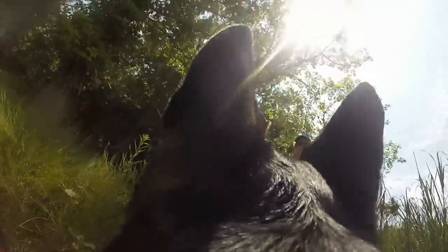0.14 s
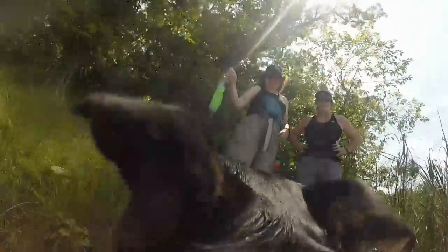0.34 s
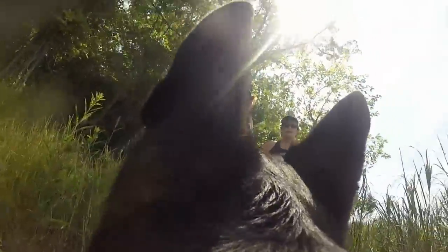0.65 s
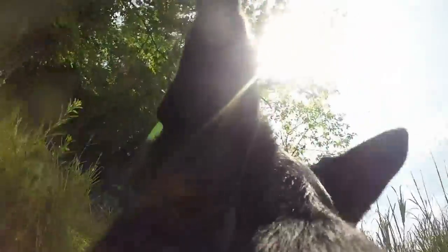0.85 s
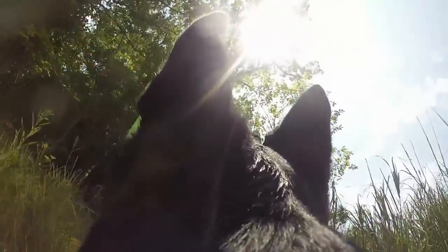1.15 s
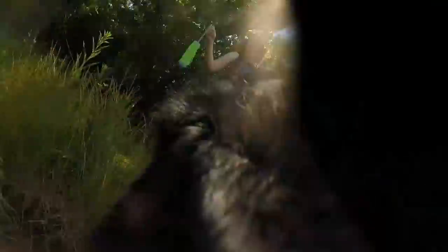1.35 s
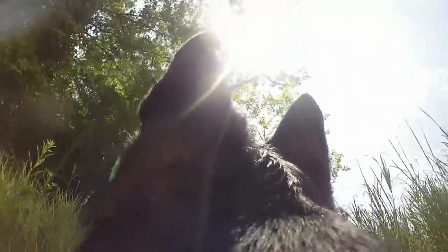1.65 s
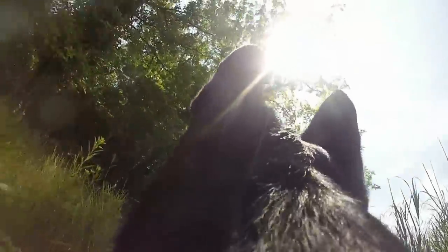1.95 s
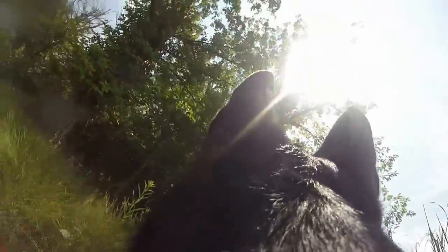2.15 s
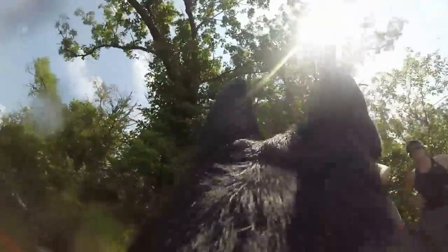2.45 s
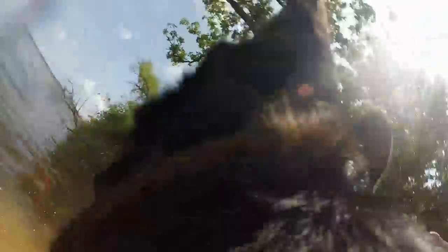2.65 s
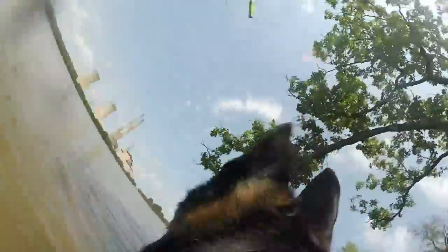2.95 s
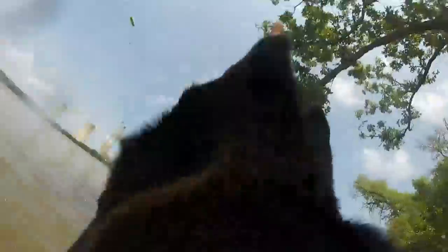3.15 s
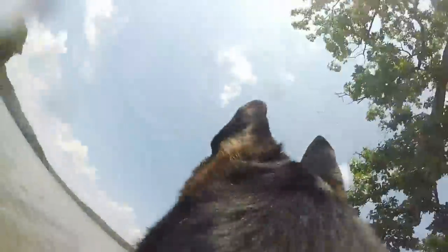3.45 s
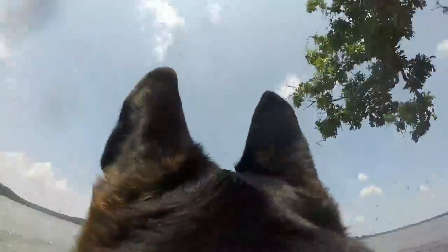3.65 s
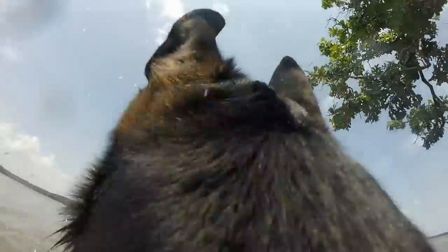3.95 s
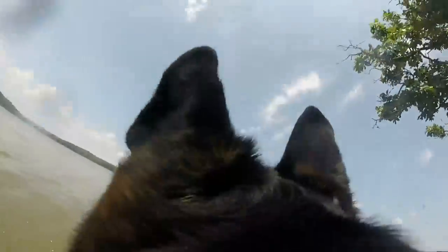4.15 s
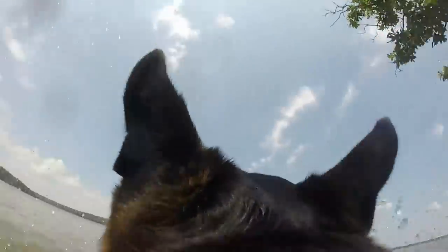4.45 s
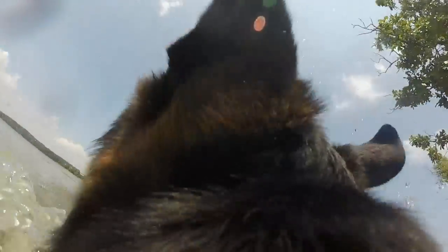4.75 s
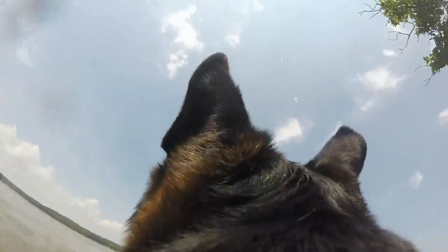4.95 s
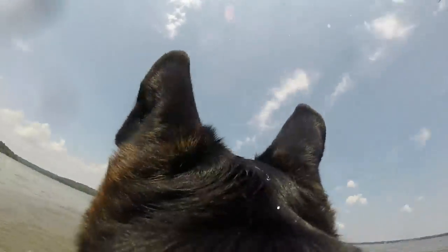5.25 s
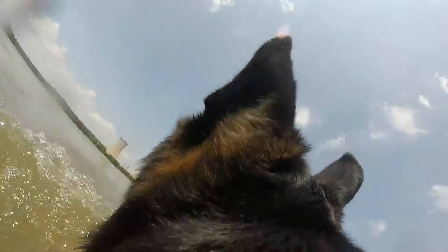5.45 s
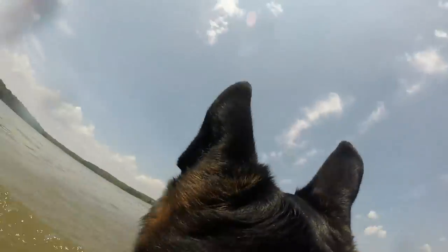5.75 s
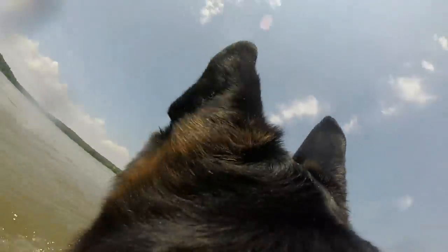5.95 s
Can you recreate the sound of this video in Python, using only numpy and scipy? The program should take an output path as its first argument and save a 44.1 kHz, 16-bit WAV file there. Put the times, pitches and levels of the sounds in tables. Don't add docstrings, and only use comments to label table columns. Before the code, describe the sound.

A microphone inside a hollow case on a dog's back catches everything close and boxy. A jolt, low swaying rumble and strap rub open the scene. The dog barks at about 0.3 s, loud and hoarse, again more weakly at 0.8 s, and loudly at 1.35 s with a hard buckle click; each bark rises quickly, cracks into breath and falls, with a faint dull echo from the bank. From 1.5 to 2.3 s it is fairly quiet, with faint rustle and small bumps. Around 2.4-2.9 s bounding thuds, sloshes and a flurry of bright ticks build. Heavy jolts and a knock hit at 3.1-3.2 s, with more thumps and splashing at 3.7-3.95 s. A big slap and sharp rattle come at 4.3 s, then a brief dip. Until about 6.1 s, paddling churns on: hissing spray, watery plops including a strong one at 4.76 s, droplet ticks and boomy thumps at 5.4 and 6.0 s.

```python
import sys
import numpy as np
from scipy import signal
from scipy.fft import rfft, irfft
from scipy.io import wavfile
from scipy.ndimage import uniform_filter1d

SR = 44100
rng = np.random.default_rng(int(sys.argv[2]) if len(sys.argv) > 2 else 0)


def materialize(psi):
    bounded = np.clip(np.atleast_2d(psi).T, -1, 1)
    quanta = np.round(bounded * 32767).astype(np.int16)
    wavfile.write(sys.argv[1], SR, quanta)


def natural_amplitude(level_db):
    exponent = np.asarray(level_db, float) / 20
    return 10 ** exponent


N = 269010

# frequency in Hz, level in dB per Hz.
SWAY = [(4.7, -34), (8.0, 8), (29, 4.5), (120, -31), (160, -64.5), (260, -120)]
# centre in seconds, sway in dB, half length in seconds.
LURCHES = [(0.049, -2.5, 0.035), (0.354, -10, 0.092), (0.553, -14, 0.026), (0.827, -9.5, 0.092),
           (1.1, -14, 0.016), (1.375, -10, 0.028), (1.465, -12, 0.032), (1.85, -18.5, 0.05),
           (2.057, -20.5, 0.064), (2.45, -16, 0.11), (2.6, -13.5, 0.23), (2.72, -8, 0.083),
           (2.88, -10.5, 0.082), (3.022, -10, 0.023), (3.193, -13.5, 0.081), (3.28, -20, 0.077),
           (3.761, -10, 0.031), (3.893, -10.5, 0.061), (4.059, -16.5, 0.05), (4.2, -8.5, 0.011),
           (4.33, -2, 0.011), (4.42, -21.5, 0.12), (4.635, -8, 0.023), (4.735, -16.5, 0.061),
           (5.074, -22, 0.05), (5.382, -9.5, 0.05), (5.504, -21, 0.084), (5.759, -7, 0.051),
           (6.039, -12, 0.051)]
REST_SWAY_DB, SWAY_FOLLOWS = -28, 0.39
# frequency in Hz, level in dB per Hz.
RUB = [(35, -37), (60, -3), (177, -5.5), (244, -5), (323, -14.5), (568, -21), (632, -30), (858, -20.5),
       (1000, -41.5), (1300, -49.5), (2200, -120)]
# time in seconds, rub in dB.
EFFORT = [(0, -37.5), (.15, -46), (.39, -39), (.8, -52.5), (1.2, -47), (1.5, -63.5), (1.85, -52.5),
          (2.43, -48), (2.74, -35), (2.89, -51.5), (3.1, -30), (3.45, -52), (3.7, -52), (3.91, -26),
          (4.08, -38), (4.8, -32), (4.93, -40), (6.1, -43)]

# frequency in Hz, level in dB per Hz.
SPLASH = [(350, -24.5), (600, 2), (811, -8), (1160, 2.5), (1330, 0.5), (1690, 2), (2620, -1.5),
          (2990, -0.5), (3270, -6.5), (3630, -5), (5000, -19), (6500, -17), (11000, -120)]
# frequency in Hz, level in dB per Hz.
SPRAY = [(2650, -56), (4500, 3.5), (5070, -4), (5860, -1), (7520, -3), (8220, -11.5), (8930, -8),
         (12100, -12), (13300, -14.5), (14800, -19), (15600, -28.5)]
# time in seconds, splash in dB.
CHURN = [(0, -42), (.15, -52), (.39, -50), (.51, -56.5), (.8, -45), (1.14, -56.5), (1.61, -62), (2.29, -56),
         (2.58, -49), (2.76, -39.5), (3.04, -45.5), (3.21, -56.5), (3.62, -50.5), (3.91, -40), (4.54, -43),
         (4.7, -39), (5.32, -42), (6.1, -47.5)]
# centre in seconds, dip in dB, half length in seconds.
LULL = (4.385, -4, 0.036)
SPRAY_DB, SPRAY_FOLLOWS = -61, 0.92
# frequency in Hz, width in Hz, level in dB.
PORT = (5660, 350, 2.9)

# start in seconds, peak in dB, ping in Hz, case body in dB.
TICKS = [(0.021, -34, 5580, 9), (0.073, -39, 3980, 5), (0.084, -33, 4370, 5), (0.48, -30.5, 3350, -22),
         (.606, -39, 5800, 8), (.707, -45, 5370, -11), (0.7413, -35, 4600, 12), (1.14, -42, 3720, 9),
         (1.906, -42.5, 5460, -4), (2.619, -22.5, 5430, -3.5), (2.6415, -23.5, 4600, 11),
         (2.659, -26.5, 5640, 5), (2.6979, -32.5, 4680, 5), (2.7846, -27.5, 3970, 5),
         (2.986, -33, 4030, -27), (3.0885, -25.5, 5300, -17), (3.1, -31, 4640, -9), (3.616, -47, 5500, -13),
         (3.694, -38, 4770, 4), (4.1862, -26.5, 4400, 1), (4.788, -29, 7400, 4), (4.8356, -29, 3980, -7),
         (4.9591, -37, 5800, -3), (5.1347, -36, 4060, -11), (5.435, -23.5, 6670, -0.5),
         (5.504, -38, 4430, -13), (5.622, -35, 4200, -13), (5.895, -38, 4350, -18),
         (5.9683, -25.5, 6260, -5), (6.0267, -37, 5700, 9), (0.342, -29, 5000, 0), (.638, -41, 7500, -3),
         (.81, -50, 5000, -10), (2.215, -50, 9000, -14.5), (2.6025, -45, 5000, -5), (2.861, -31, 3640, -10),
         (3.131, -30, 4700, 3), (3.825, -34, 3630, -8), (4.433, -34, 3500, 4), (4.715, -44, 3460, -8),
         (4.864, -36, 5800, -5), (4.985, -31, 3710, -10), (5.074, -38, 5800, -5), (5.552, -52, 8000, -15),
         (5.583, -40, 6000, -10), (5.815, -30.5, 6950, -10), (5.477, -43, 3460, 4), (5.916, -37, 5900, -12),
         (6.074, -37, 5890, 4), (6.089, -42, 9000, -15)]
# frequency in Hz, width in Hz, level in dB.
CASE = [(852, 84, 16.5), (1340, 200, -30.5), (1460, 81, 6.5), (2500, 1470, 2), (3300, 200, -6),
        (5800, 200, -18), (6850, 300, 3), (10500, 1800, -96.5)]
KNOCK_S = [1.3975, 1.404, 3.1942, 4.2868, 4.333, 4.7615, 4.756, 4.309, 5.4752, .0215]
# peak in dB, rattle T60 in seconds, dull part in dB, bright part in dB.
KNOCKS = [
    (-5, 0.02, -5, -15.5),
    (-11.5, 0.045, 4, 3),
    (-1, 0.0084, -8, -6),
    (-18.5, 0.034, 1, 11.5),
    (-20, 0.015, 13, 18),
    (-14.5, 0.024, 0, 5.5),
    (-26, 0.013, 8, -5),
    (-24, 0.014, 13, -3),
    (-32.5, .012, 5, -10),
    (-26, 0.018, -8, -5),
]
# frequency in Hz, width in Hz, level in dB.
BUCKLE = [(1680, 215, 7), (2380, 700, -1), (4030, 500, -10), (5500, 900, -14.5), (7650, 520, -14),
          (11240, 2700, -29)]
# start in seconds, peak in dB, push in Hz, case boom in dB.
THUDS = [(0.022, -13, 72.7, -15.5), (0.511, -42, 74, 0.5), (1.9, -37.5, 70.4, 2), (2.215, -38.5, 102, 0),
         (2.358, -25, 73, -23), (2.435, -23, 88.8, -10), (2.619, -25, 71.4, -10), (2.659, -11, 72.7, -8),
         (2.693, -16, 95, -10), (2.839, -34.5, 72.7, 10), (2.887, -35, 72.7, 6.5), (3.094, -19, 73, -5),
         (3.105, -10.5, 72, -14), (3.18, -0.5, 92, -13.5), (3.629, -29, 90, -10), (3.722, -16.5, 151, -3.5),
         (3.731, -16.5, 152, -20), (3.751, -10.5, 72.6, -14), (3.893, -17, 72.7, -13),
         (3.94, -10.5, 74.5, -13.5), (4.184, -25, 59.6, -15), (4.298, -11.5, 181, -26),
         (4.307, -13.5, 193, -17), (4.324, -2, 52, -21), (4.715, -13.5, 126, -14.5),
         (4.814, -29.5, 103, -30), (5.256, -24, 80, -13), (5.402, -5, 145, -14), (5.707, -23.5, 72.7, -5),
         (6.029, -6.5, 87, -15)]
BOOM_HZ, BOOM_T60_S = 235, .055
JOLT_T60_S, JOLT_STIFFENS = 0.019, 0.077
# start in seconds, rms in dB, length in seconds,
# centre in Hz.
SLOSHES = [(1.346, -22, 0.079, 126), (2.709, -45.5, 0.28, 210), (3.909, -36.5, 0.051, 300),
           (4.488, -37, 0.039, 300), (4.7, -41.5, 0.17, 353), (1.815, -58.5, 0.041, 2500),
           (1.89, -52.5, 0.038, 1780), (2.04, -55, 0.026, 2500), (2.412, -45.5, 0.055, 1950),
           (2.638, -41.5, 0.08, 1870), (3.085, -34.5, 0.093, 1340), (3.293, -44.5, 0.021, 1370),
           (3.726, -33.5, 0.016, 1090), (3.864, -33.5, 0.058, 1670), (4.299, -36, 0.0093, 700),
           (4.314, -56, 0.0075, 890), (4.442, -40.5, 0.068, 1380), (4.754, -35, 0.011, 1110),
           (4.83, -35.5, 0.01, 1500), (5.474, -40.5, 0.015, 1000), (5.708, -38.5, 0.032, 1460),
           (4.065, -49, 0.067, 2930), (4.898, -45.5, 0.22, 2630), (5.075, -58, 0.27, 2940),
           (5.25, -43, 0.075, 2740), (5.77, -49, 0.071, 2500), (5.59, -67, 0.031, 1800),
           (5.703, -44, 0.046, 493), (3.881, -43, 0.052, 700), (4.303, -51, 0.026, 595),
           (4.717, -63, .1, 700), (3.621, -46, 0.22, 197), (.04, -54.5, .08, 4600),
           (0.332, -52.5, 0.039, 5500), (1.82, -67, .04, 8000), (2.045, -63, .03, 7960),
           (2.41, -56.5, .06, 7950), (2.6, -34, 0.26, 155), (3.3, -57, 0.27, 374), (1.1, -54.5, 0.043, 249)]

# time in seconds, fold pitch in Hz, level in dB, mouth opening in dB per octave,
# second partial in dB.
BARKS = [
    [(.255, 184, -23, -19.5, -2), (.276, 276, -10, -12, -8), (.288, 371, -16.5, -3, 0),
     (.303, 334.7, -11.5, -3.5, 3), (.309, 413, -15.5, -3.5, -1), (.322, 300, -8.5, -6, 1.5),
     (.337, 270.5, -14, 3.5, 9), (.358, 206, -21.5, -7.5, -7), (.405, 110, -37, -27, 6)],
    [(.766, 178, -25.5, -16, -8), (.785, 240.2, -22.5, -10.5, -13), (.8, 328.4, -26, -6.5, 5),
     (.816, 356, -17.5, -7, 6.5), (.825, 339, -18, -5.5, -7.5), (.834, 279.6, -17, -7, -1.5),
     (.852, 218, -19, -1, 1.5), (.876, 192, -24, -16.5, 0.5), (.918, 103, -33.5, -5, -9)],
    [(1.299, 210.7, -28, -31, -5), (1.332, 246.2, -13, -10, -8.5), (1.346, 337, -21.5, -3.5, 4.5),
     (1.36, 381.5, -9.5, 0.5, 0.5), (1.376, 349.6, -13.5, -3, 1.5), (1.39, 337.8, -7.5, -7, 2.5),
     (1.41, 300, -19, -3.5, -2), (1.44, 249, -25.5, -8.5, -7.5), (1.46, 180, -44, 9.5, -2)],
]
# frequency in Hz, width in Hz, level in dB.
THROAT = [(300, 180, -1.5), (776, 250, 0.9), (1208, 97, 7.5), (1684, 98, 7.5), (2054, 224, -15),
          (2380, 300, -29.5), (2770, 200, -26.5), (4600, 200, -59)]
HOARSE = [.55, .45, .35]
CLEAR_RISE = [.25, .75, .2]
# centre in seconds, depth in dB, half length in seconds.
CRACKS = [(.307, -12, 0.0015), (0.363, -2, .004), (0.341, -8, .003), (0.795, -12, 0.0035),
          (0.821, -21, 0.0019), (0.844, -19, .003), (0.871, -18, .004), (1.352, -5, 0.0033),
          (1.415, -8, 0.0037)]
SHUT_DB, WIDE_DB = -23.5, -8.5
DOUBLING_S = 0.023
UPPER_LOSS_DB = -11
CLOSING_SAG, CLOSING_S = .95, .05
SWELL_S = .012
ECHO_DB = [-24.5, -23, -28]
# delay in seconds, scatter in seconds.
BANK_ECHO = (0.115, 0.008)

# start in seconds, peak in dB, pitch in Hz.
PLOPS = [(3.617, -47, 1230), (3.6857, -32, 3110), (3.73, -32, 1200), (3.8837, -26, 1980),
         (3.9197, -26, 1660), (3.947, -28, 1280), (4.063, -37, 1230), (4.142, -39, 1210),
         (4.185, -43, 1780), (4.2855, -27, 1270), (4.3322, -30, 1900), (4.4455, -35, 1550),
         (4.65, -35, 1390), (4.7612, -10, 1670), (4.8271, -25, 1680), (4.9648, -22.5, 1830),
         (5.1324, -23.5, 2940), (5.2791, -24, 2430), (5.311, -33, 1220), (5.3579, -34, 1340),
         (5.4267, -31, 1940), (5.474, -30, 1110), (5.605, -28.5, 1700), (5.649, -37, 1120),
         (5.7137, -32, 1150), (5.7679, -29, 1650), (5.8662, -34, 1870), (5.8922, -34, 1920),
         (5.9535, -35, 1900)]
PLOP_CYCLES, PLOP_RISE, PLOP_DB = 51, 0.046, -3.5


def rms_one(x):
    return x / np.sqrt(np.mean(x ** 2) + 1e-20)


def in_time(rows, t):
    s, *columns = np.transpose(rows)
    return [np.interp(t, s, c) for c in columns]


def drift(rate_hz):
    r = np.exp(-2 * np.pi * rate_hz / SR)
    noise = rng.standard_normal(N + 20000)
    return rms_one(signal.lfilter([1], [1, -2 * r, r * r], noise)[20000:])


def coloured(x, spectrum):
    hz, level_db = np.transpose(spectrum)
    grid = np.arange(N // 2 + 1) * SR / N + 1
    gain_db = np.interp(np.log(grid), np.log(hz), level_db, -120, -120)
    return rms_one(irfft(rfft(x) * natural_amplitude(gain_db), N))


def resonate(x, peaks):
    out = 0
    for k, (hz, width_hz, level_db) in enumerate(peaks):
        r = np.exp(-np.pi * width_hz / SR)
        zeros = [(1 - r * r) / 2, 0, (r * r - 1) / 2]
        poles = [1, -2 * r * np.cos(2 * np.pi * hz / SR), r * r]
        out = out + (-1) ** k * natural_amplitude(level_db) * signal.lfilter(zeros, poles, x)
    return out


def lowpass(x, hz, order):
    return signal.sosfilt(signal.butter(order, hz, fs=SR, output="sos"), x)


def bandpass(x, low_hz, high_hz, order):
    return signal.sosfilt(signal.butter(order, [low_hz, high_hz], "band", fs=SR, output="sos"), x)


def add(out, s, piece):
    i = round(s * SR)
    out[i:i + len(piece)] += piece[:N - i]


def grains(per_s, spread_db):
    sizes = natural_amplitude(spread_db * np.minimum(rng.exponential(1, N), 5)) * rng.choice([-1, 1], N)
    return sizes * (rng.random(N) < per_s / SR)


def patchy(x, surge_db, low_hz, count, patchy_db):
    out = x
    for low in low_hz * 2 ** (np.arange(count) / 2):
        band = bandpass(x, low, min(low * 2 ** .5, 19000), order=1)
        out = out + band * (natural_amplitude(patchy_db * drift(25)) - 1)
    return rms_one(out * natural_amplitude(surge_db))


def swaying(t, rub_db):
    power = natural_amplitude(2 * (REST_SWAY_DB + SWAY_FOLLOWS * (rub_db + 44.0)))
    for s, level_db, half in LURCHES:
        power = power + natural_amplitude(2 * level_db) * np.exp(-2 * ((t - s) / half) ** 2)
    return 10 * np.log10(power)


def harness(sway_db, rub_db):
    sway = coloured(rng.standard_normal(N), SWAY)
    sway = sway / np.sqrt(uniform_filter1d(sway ** 2, size=5000) + 0.036)
    lumps = rms_one(grains(86, spread_db=1.5))
    rub = coloured(rng.standard_normal(N) + 0.53 * lumps, RUB)
    rub = patchy(rub, 2.2 * drift(10), 60.6, count=9, patchy_db=3.0)
    return natural_amplitude(sway_db) * sway + natural_amplitude(rub_db) * rub


def ringing_bubbles():
    dealt, clicks, out = rng.integers(0, 16, N), grains(900, spread_db=2.7), 0
    for k, hz in enumerate(np.geomspace(800, 4500, 16)):
        out = out + resonate(clicks * (dealt == k) + 1e-18, [(hz, hz / 25.0, 0)])
    return coloured(out, [(700, 2.2), (4800, 5.7)])


def water(splash_db, spray_db):
    churn = coloured(rng.standard_normal(N) + 0.31 * ringing_bubbles(), SPLASH)
    droplets = rms_one(grains(300, spread_db=8.5))
    spray = coloured(rng.standard_normal(N) + 0.16 * droplets, SPRAY)
    spray = spray + resonate(spray, [PORT])
    surge_db = 1.1 * drift(12) + 1.4 * drift(70)
    churn = patchy(churn, surge_db, 379.2, count=8, patchy_db=0.0)
    spray = patchy(spray, surge_db, 4574, count=4, patchy_db=.8)
    return natural_amplitude(splash_db) * churn + natural_amplitude(spray_db) * spray


def ticks():
    out, t = np.zeros(N), np.arange(400) / SR
    shell = [(3170, 730, -1.5), (4550, 1000, 1.0), (5800, 800, 7.5), (7090, 640, -4), (11550, 1000, -35.0)]
    for (s, level_db, hz, body_db), crack in zip(TICKS, rng.standard_normal((len(TICKS), 400))):
        ping = natural_amplitude(-60 * t / 0.006) * np.sin(2 * np.pi * hz * t)
        snap = 2.0 * resonate(natural_amplitude(-60 * t / 0.0029) * crack, shell)
        body = natural_amplitude(min(body_db, 4) - 10.5 - 60 * t / 0.033) * resonate(crack, CASE[1:4]) * 3.0
        add(out, s, natural_amplitude(level_db - 3.0) * (ping + snap + body))
    return out


def knocks():
    out, t = np.zeros(N), np.arange(2000) / SR
    thin = signal.butter(8, 1480, "high", fs=SR, output="sos")
    rattles = rng.standard_normal((len(KNOCKS), 2000))
    for s, (level_db, t60, dull_db, bright_db), rattle in zip(KNOCK_S, KNOCKS, rattles):
        decay = natural_amplitude(-60 * t / t60)
        blow = 0.62 * rattle * decay + 1.23 * (t < .00005)
        bright = natural_amplitude(bright_db) * resonate(blow * decay, BUCKLE[2:])
        ring = signal.sosfilt(thin, resonate(blow, BUCKLE[:2]) + bright)
        ring = ring + natural_amplitude(dull_db) * resonate(blow, [(700, 380, 0.0015)])
        add(out, s, natural_amplitude(level_db) * ring / np.abs(ring).max())
    return out


def thuds():
    out, t = np.zeros(N), np.arange(5000) / SR
    rise = (1 - np.exp(-t / 0.0025)) ** 2
    for (s, level_db, hz, boom_db), side in zip(THUDS, rng.choice([-1, 1], len(THUDS))):
        t60 = JOLT_T60_S * np.exp(-JOLT_STIFFENS * (level_db + 10.0))
        push = rise * natural_amplitude(-60 * t / max(t60, .016)) * np.sin(2 * np.pi * hz * t)
        boom = rise * natural_amplitude(boom_db + 9 - 60 * t / BOOM_T60_S) * np.sin(2 * np.pi * BOOM_HZ * t)
        add(out, s, side * natural_amplitude(level_db) * (push / np.abs(push).max() + boom))
    return lowpass(out, 790, order=2)


def sloshes():
    out, t = np.zeros(N), np.arange(16000) / SR
    noises = rng.standard_normal((len(SLOSHES), 2, 16000))
    for (s, level_db, length, hz), (noise, lumps) in zip(SLOSHES, noises):
        grainy = noise * natural_amplitude(2.5 * rms_one(lowpass(lumps, 100.0, order=2)))
        wide = [(hz, 1.115 * hz, 0)]
        band = resonate(resonate(grainy, wide), wide)
        swell = np.e * 3 * t / length * np.exp(-3 * t / length)
        add(out, s, natural_amplitude(level_db) * rms_one(band) * swell)
    return out


def hoarseness(opening_db, most):
    return most * np.clip((opening_db - SHUT_DB) / (WIDE_DB - SHUT_DB), .1, 1)


def throat(x, peaks, closed):
    lower = [(hz * CLOSING_SAG, width_hz, level_db) for hz, width_hz, level_db in peaks]
    return (1 - closed) * resonate(x, peaks) + closed * resonate(x, lower)


def partial_weights(k, t, pitch, opening_db, second_db, odd):
    tilt_db = opening_db * np.log2(np.clip(k * pitch, 150, 1800) / 600)
    weights = natural_amplitude(tilt_db) * np.where(k % 2, np.clip(odd, 0.12, 1), 1)
    weights[0] *= natural_amplitude(-.8 * (opening_db + 11.5))
    crack_db = sum(depth_db * np.exp(-((t - s) / half) ** 2) for s, depth_db, half in CRACKS)
    weights[1] *= natural_amplitude(second_db + crack_db)
    weights[2:] *= natural_amplitude(UPPER_LOSS_DB * np.clip(1 - odd, 0, 1))
    return weights


def bank_echo(far):
    lag_s, scatter_s = BANK_ECHO
    dull = bandpass(far, 900, 1350, order=2)
    leaves = rng.standard_normal(3000) * np.exp(-np.arange(3000) / SR / scatter_s) / 30
    out = np.zeros(N)
    add(out, lag_s, signal.fftconvolve(dull, leaves)[:N])
    return out


def barks():
    out, far = np.zeros(N), np.zeros(N)
    wobble, flutter = drift(113), drift(190)
    breath = lowpass(rng.standard_normal(N), 4700, order=2)
    windpipe = [(1150, 250, 0.1), (1670, 230, 0.1)]
    breath = 0.8 * breath + 1.2 * resonate(breath, windpipe)
    k = np.arange(1, 25)[:, None]
    for rows, most, clear, echo_db in zip(BARKS, HOARSE, CLEAR_RISE, ECHO_DB):
        span = np.arange(round(rows[0][0] * SR), round(rows[-1][0] * SR))
        pitch, level_db, opening_db, second_db = in_time(rows, span / SR)
        to_top_s = (np.argmax(pitch) - np.arange(len(span))) / SR
        closed = np.clip(-to_top_s / CLOSING_S, 0, 1)
        odd = .5 + to_top_s / DOUBLING_S
        rough = hoarseness(opening_db, most) * (1 - clear * np.clip(odd, 0, 1))
        phase = 2 * np.pi * np.cumsum(pitch * (1 + 0.047 * rough * wobble[span])) / SR
        weights = partial_weights(k, span / SR, pitch, opening_db, second_db, odd)
        shimmer = natural_amplitude(flutter[span] * np.where(k > 2, 1.0 + 3.5 * rough, 1.5 + rough))
        voice = throat((shimmer * weights * np.cos(k * phase)).sum(axis=0), THROAT, closed)
        gated = breath[span] * (1 + np.cos(2 * phase)) * natural_amplitude(opening_db)
        hoarse = throat(gated, THROAT[1:], closed)
        mixed = voice * (1 - .4 * rough) + 3.6 * rough * hoarse
        mixed = lowpass(mixed, 2600, order=1) + natural_amplitude(-17) * resonate(mixed, [(4600, 3200, 0.33)])
        even = np.sqrt(uniform_filter1d(mixed ** 2, size=1100) + 1e-9)
        ends = np.minimum(span - span[0], span[-1] - span) / SR / SWELL_S
        out[span] = natural_amplitude(level_db) * np.clip(ends, 0, 1) ** 2 * mixed / even
        far[span] = natural_amplitude(echo_db) * out[span]
    return out + bank_echo(far)


def plops():
    out, t = np.zeros(N), np.arange(1500) / SR
    for s, level_db, hz in PLOPS:
        turns = hz * t
        ring = np.sin(2 * np.pi * turns * (1 + PLOP_RISE * turns / PLOP_CYCLES))
        decay = natural_amplitude(level_db + PLOP_DB - 60 * turns / PLOP_CYCLES)
        add(out, s, decay * (1 - np.exp(-turns)) * ring)
    return out


def scene():
    t = np.arange(N) / SR
    (splash_db,), (rub_db,) = in_time(CHURN, t), in_time(EFFORT, t)
    lull_s, lull_db, lull_half_s = LULL
    splash_db = splash_db + lull_db * np.exp(-((t - lull_s) / lull_half_s) ** 4)
    spray_db = SPRAY_DB + SPRAY_FOLLOWS * (splash_db + 50.0)
    straps = harness(swaying(t, rub_db), rub_db)
    blows = ticks() + knocks() + thuds() + sloshes() + plops()
    return (straps + water(splash_db, spray_db) + blows + barks())[None]


def low_pass(x):
    return signal.sosfilt(signal.butter(12, 15710, fs=SR, output="sos"), x)


def record(dry):
    rounded = np.clip(1.795 * np.tanh(dry / 1.83), -1, 1)
    return low_pass(lowpass(rounded, 15200, order=12))


dry = scene()
out = record(dry)
materialize(out)
```